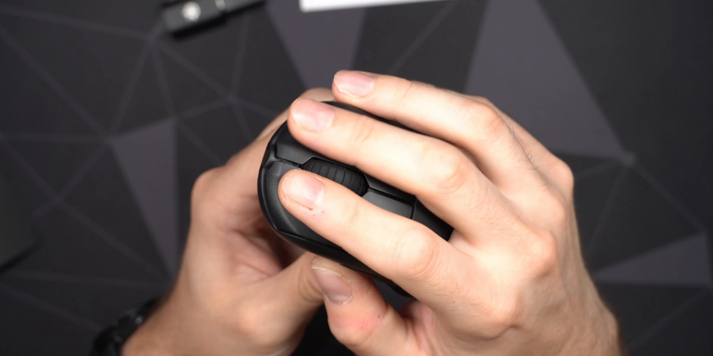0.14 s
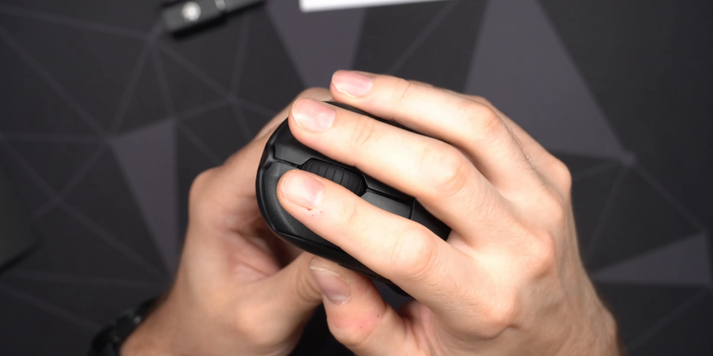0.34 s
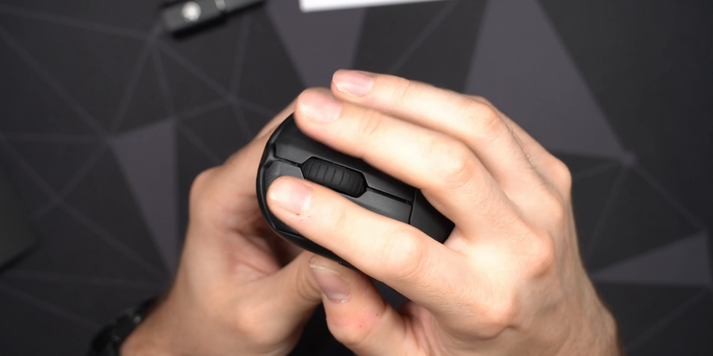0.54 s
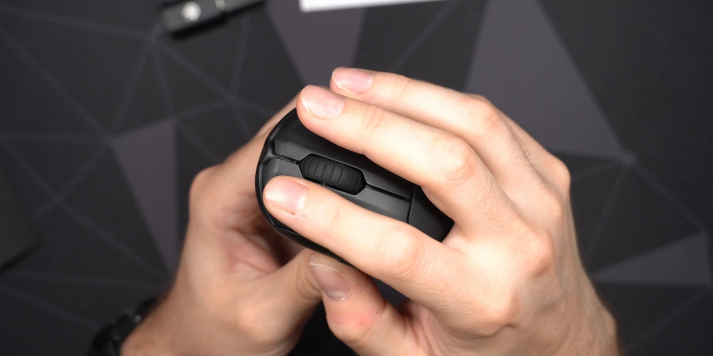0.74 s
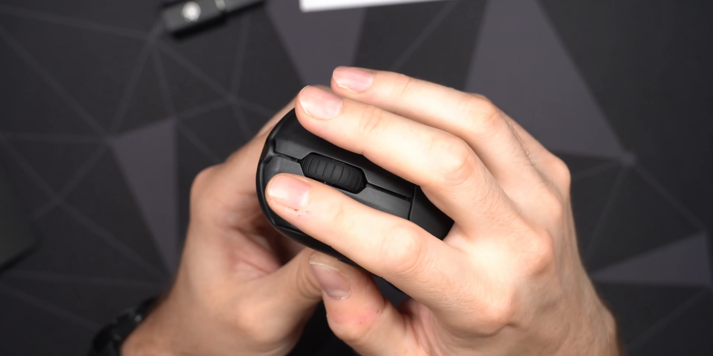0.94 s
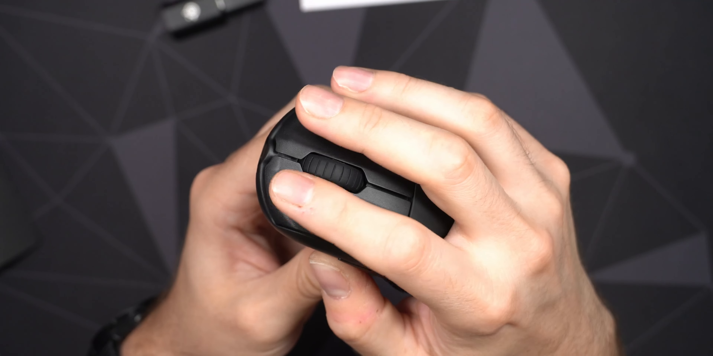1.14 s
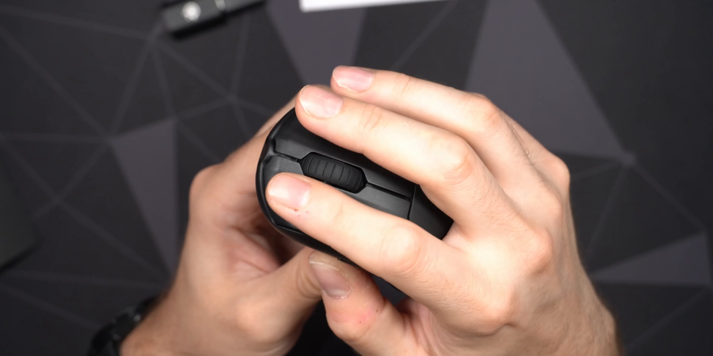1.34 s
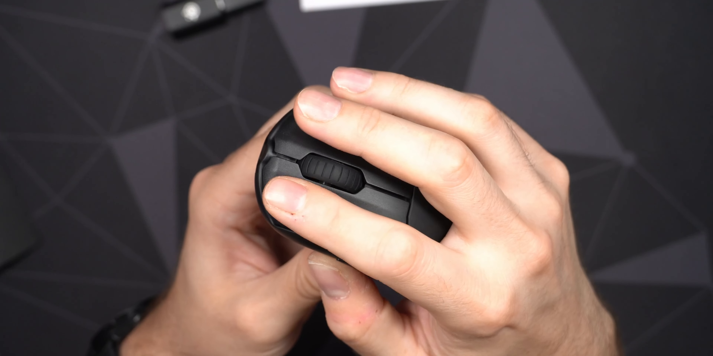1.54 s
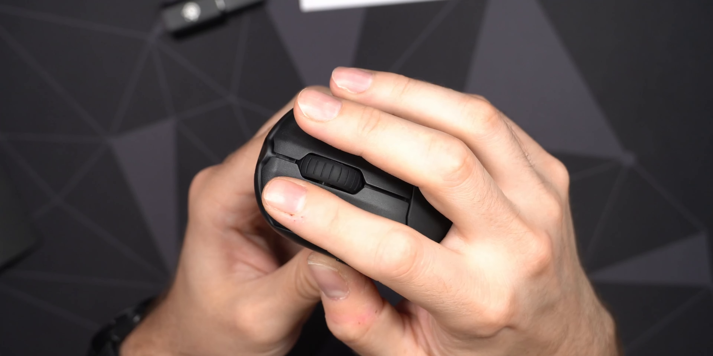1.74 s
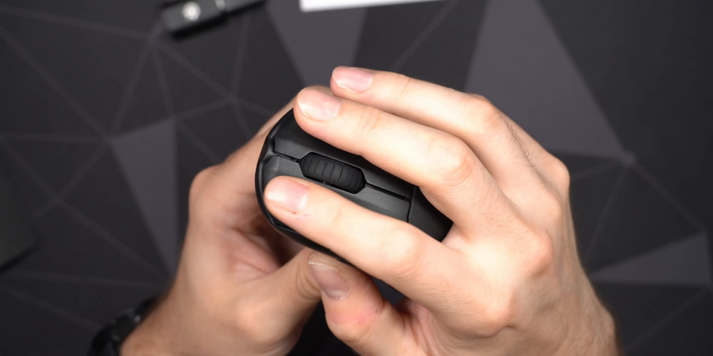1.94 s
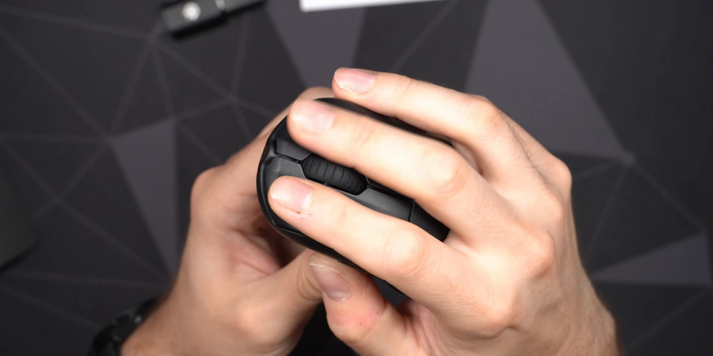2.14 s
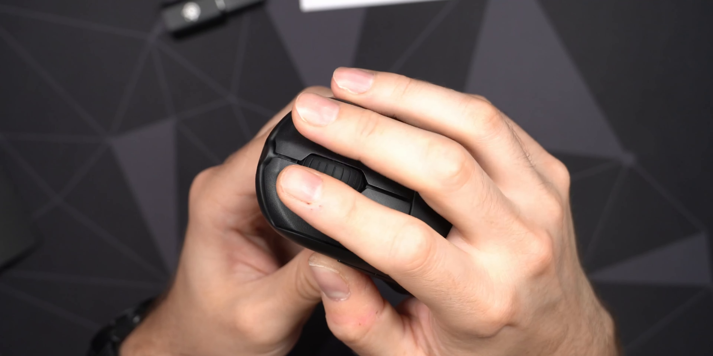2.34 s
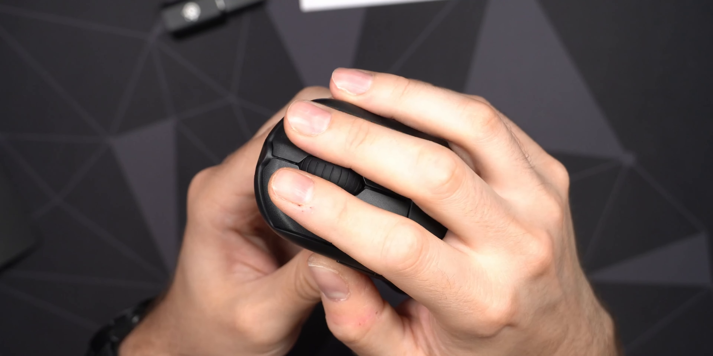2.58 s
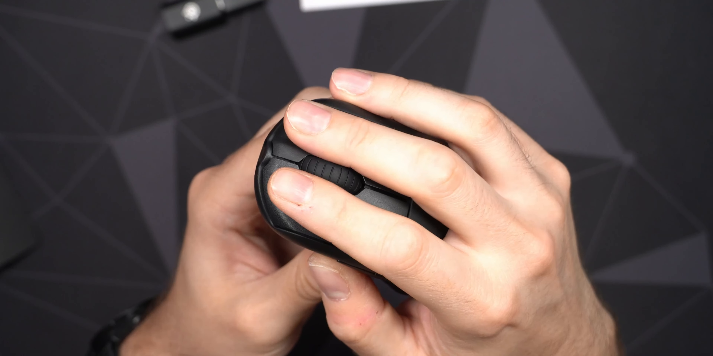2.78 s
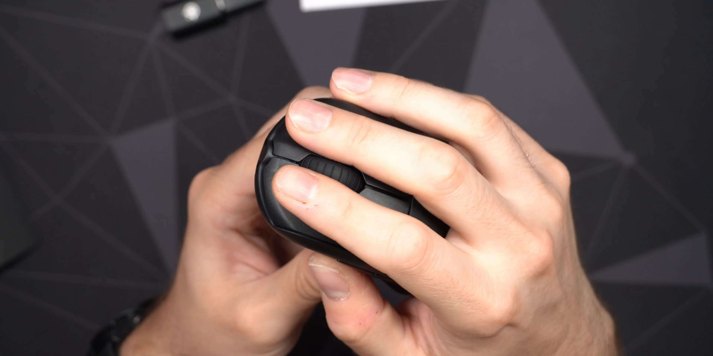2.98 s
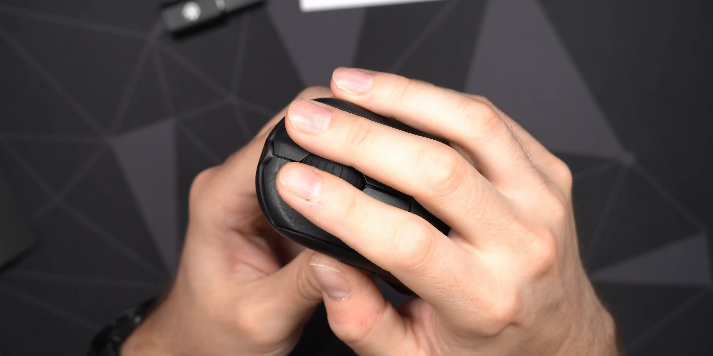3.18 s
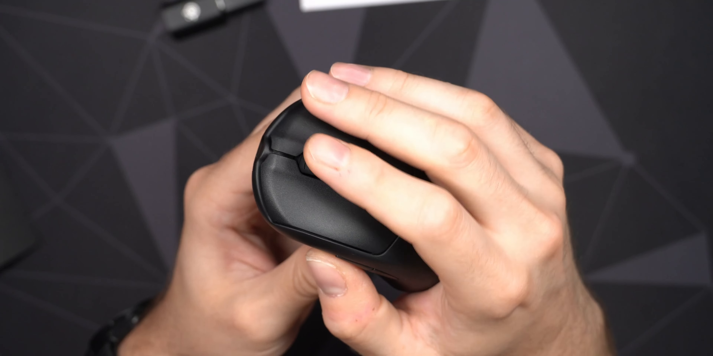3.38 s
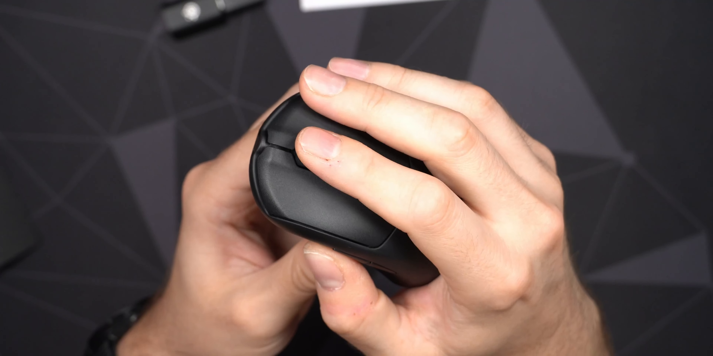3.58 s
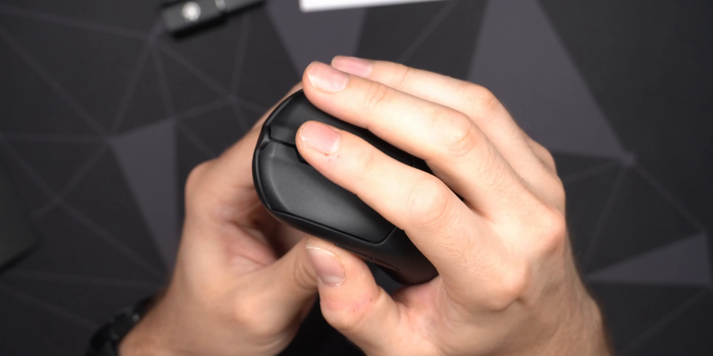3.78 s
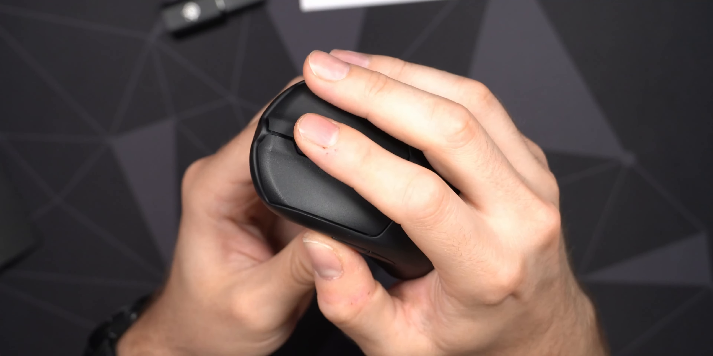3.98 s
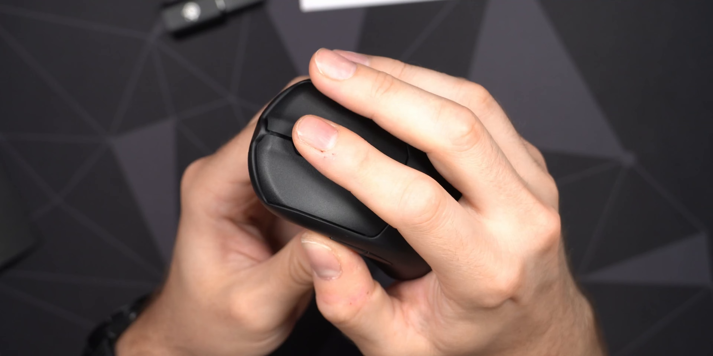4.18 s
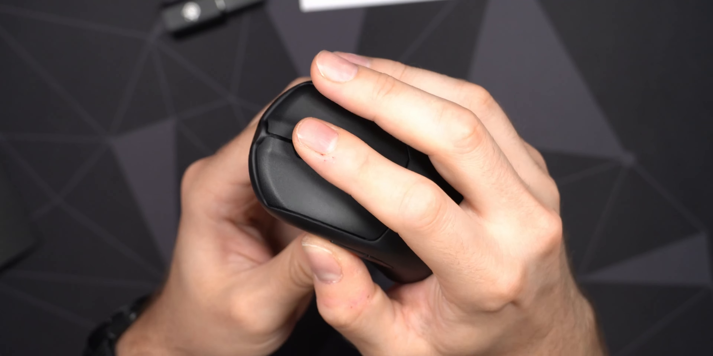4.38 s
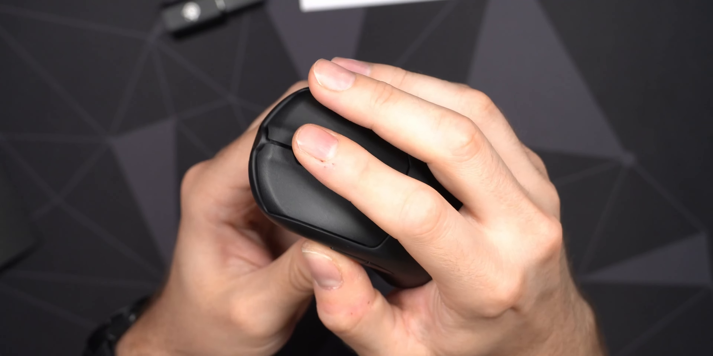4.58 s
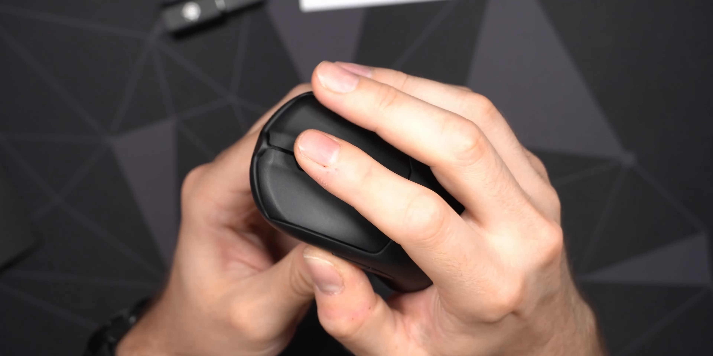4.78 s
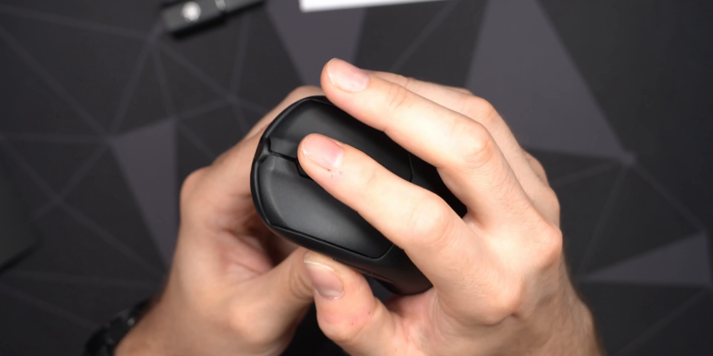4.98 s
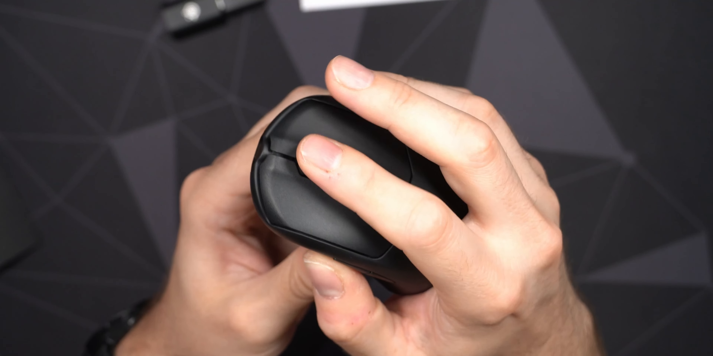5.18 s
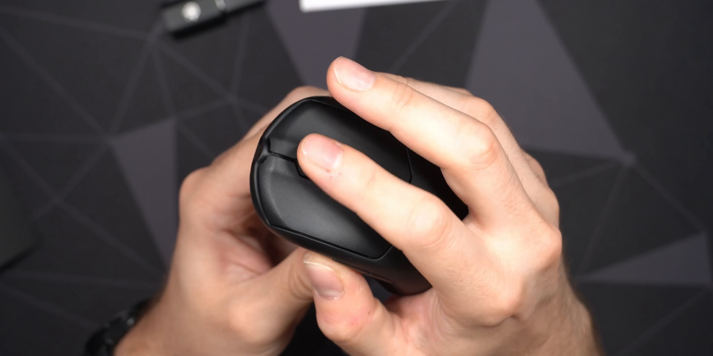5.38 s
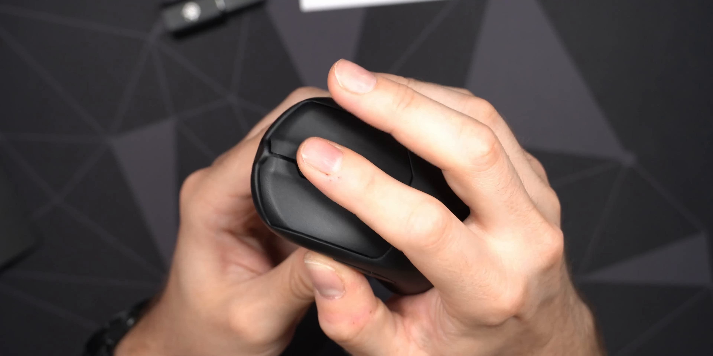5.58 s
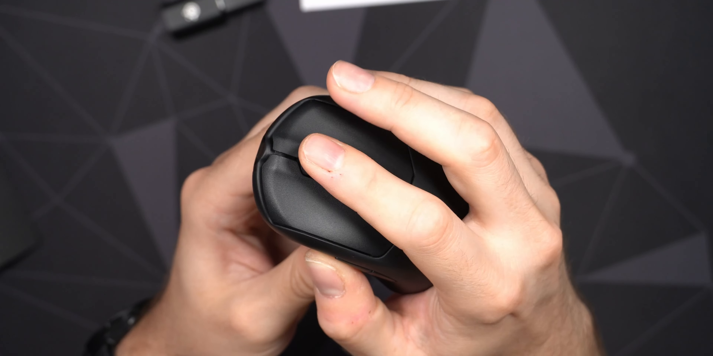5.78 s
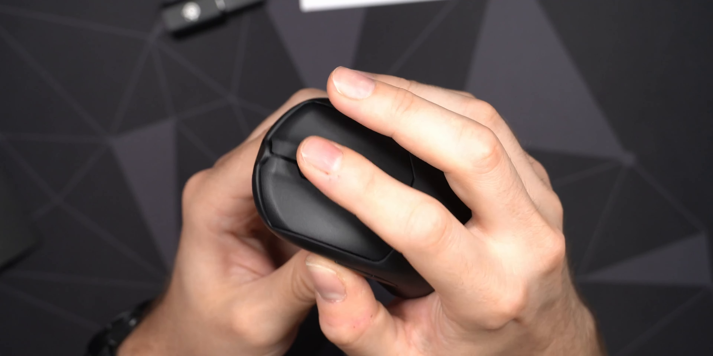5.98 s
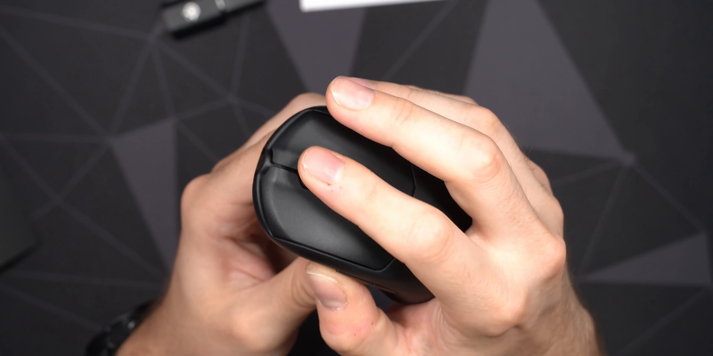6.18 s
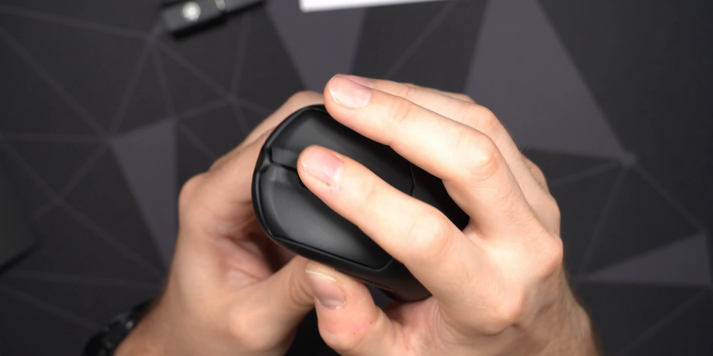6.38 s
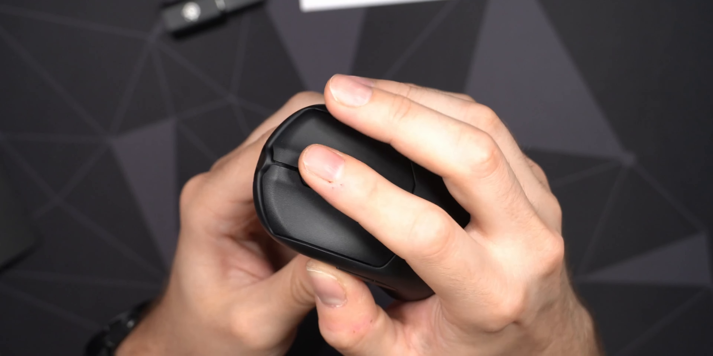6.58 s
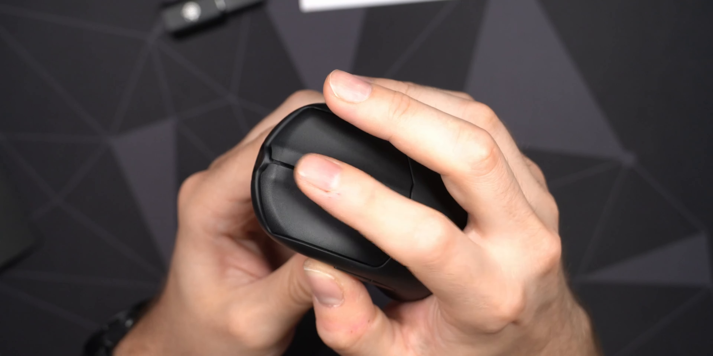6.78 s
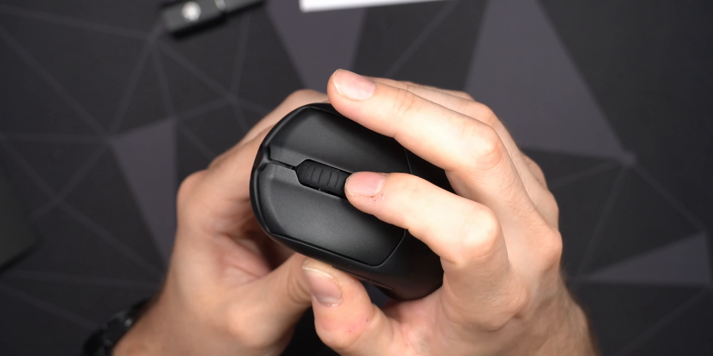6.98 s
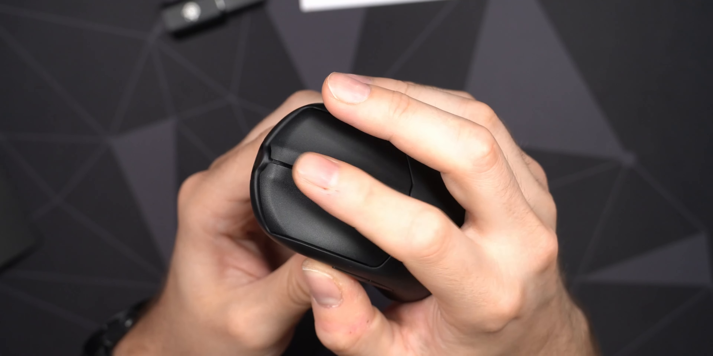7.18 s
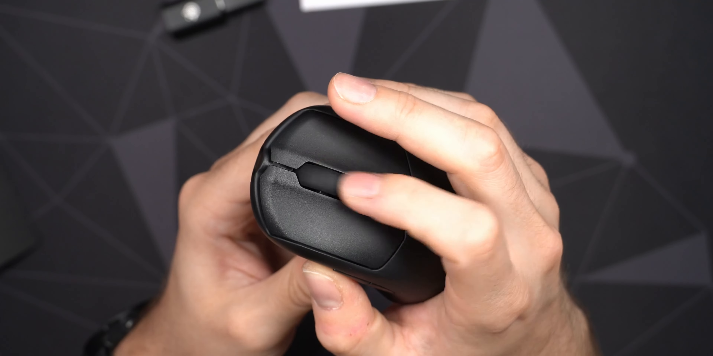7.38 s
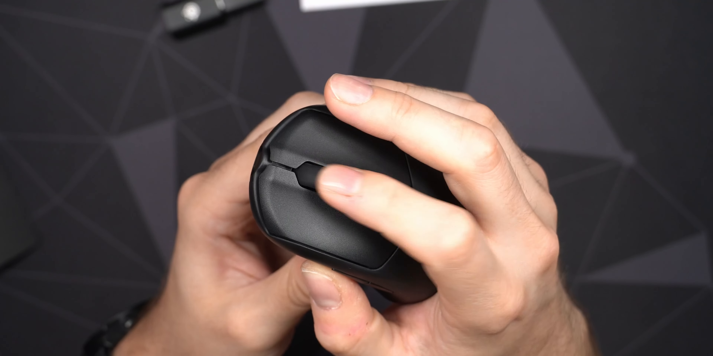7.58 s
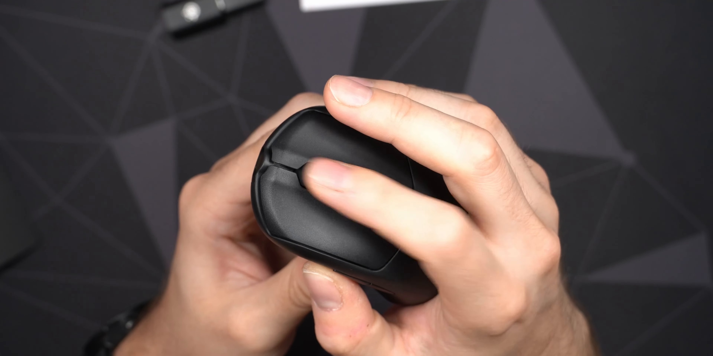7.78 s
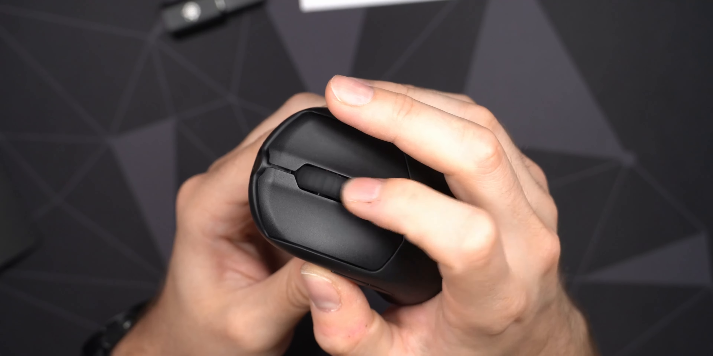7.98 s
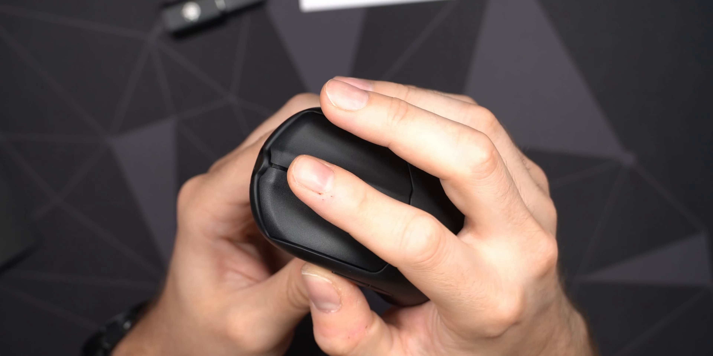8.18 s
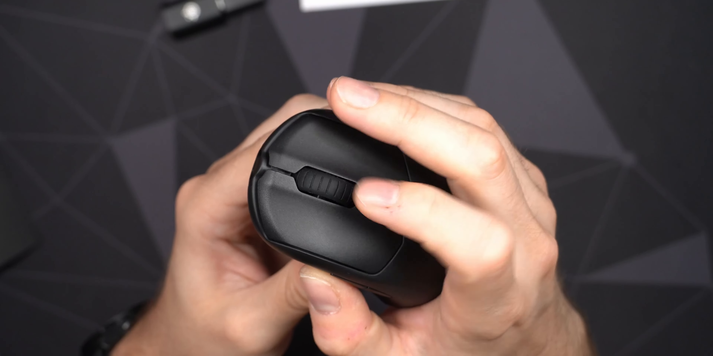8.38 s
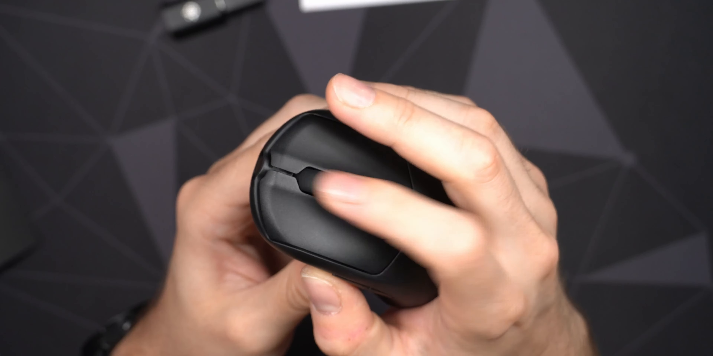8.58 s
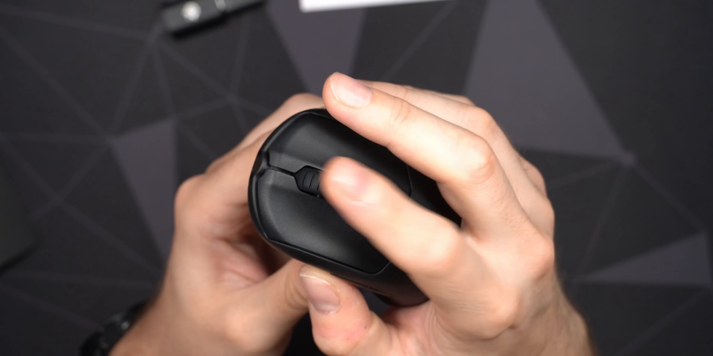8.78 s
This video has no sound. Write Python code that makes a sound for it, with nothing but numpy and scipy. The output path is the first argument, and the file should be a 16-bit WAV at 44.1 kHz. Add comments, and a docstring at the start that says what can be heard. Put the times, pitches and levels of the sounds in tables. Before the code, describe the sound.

Very close, dry sound of a computer mouse held in the hands in a small quiet room. From 0 to 0.45 s the left key gives three crisp clicks, each a hard press snap and a release snap roughly a tenth of a second later. From 0.6 to 2.1 s the right key makes nine even clicks, brighter and sharper. From 2.15 to 3.2 s the left key returns for six more, ending in a faint let-go tick at 3.3. After a short pause, thirteen duller, softer wheel-button clicks run from 3.65 to 6.5 s, slightly slower and uneven, muffled at first, one catching with a different pitch near 5.3. From 6.75 to 8.9 s the notched wheel spins in ten tiny, quiet ratcheting zips, about a quarter second apart, with skin rub and little jolts. Faint fan hum, air and low hand rumble continue beneath.

```python
"""A computer mouse clicks close by in a small quiet room, over air, fan hum and the rumble of hands.
A short run on the left key opens; a longer run on the right and a second on the left follow.
Then the left key is let go with a faint tick, and the duller switch under the wheel is clicked.
At the end a finger spins the ratcheting wheel in short bursts. Clicks, notches, jolts and thumps
are struck banks of decaying sines; contact chatter, skin, rumble, air and hum are filtered noise."""
import sys
import numpy as np
from scipy import signal
from scipy.fft import rfft, irfft
from scipy.io import wavfile

SR = 44100
rng = np.random.default_rng(int(sys.argv[2]) if len(sys.argv) > 2 else 0)


def put_to_file(sound):
    """Save the sound as 16-bit audio at rate SR, in the file named by the first command-line argument."""
    columns = np.atleast_2d(sound).T  # one column per channel
    safe = np.clip(columns, -1, 1)
    whole_steps = np.round(safe * 32767)
    wavfile.write(sys.argv[1], SR, whole_steps.astype(np.int16))


N = 389844


def from_db(db):
    """Decibels as an amplitude factor."""
    return 10 ** (np.asarray(db) / 20)


def at_hz(rows, hz):
    """Each column of a table, read on a log-frequency axis."""
    points, *columns = np.transpose(rows)
    return [np.interp(np.log(hz + 1e-9), np.log(points), column) for column in columns]


def in_time(rows, s):
    """A curve of (seconds, value) points, read at the given times."""
    return np.interp(s, *np.transpose(rows))


def noise(gain_at):
    """Steady noise of rms 1, its spectrum shaped by a gain at each frequency."""
    hz = np.arange(N // 2 + 1) * SR / N
    shaped = irfft(rfft(rng.standard_normal(N)) * gain_at(hz), N)
    return shaped / np.std(shaped)


def add(track, s, sound):
    """Mix a sound into the track at a time in seconds, trimming what falls outside."""
    start = int(round(s * SR))
    sound = sound[max(-start, 0):]
    start = int(np.clip(start, 0, N))
    track[start:start + len(sound)] += sound[:N - start]


def ring(hz, t60, level_db):
    """One blow on a body: decaying sine modes, alternate ones swinging in opposite directions."""
    t = np.arange(SR // 10) / SR
    decays = from_db(-60 * t / t60[:, None])
    swings = decays * np.sin(2 * np.pi * hz[:, None] * t)
    signs = (-1) ** np.arange(len(hz))
    return (from_db(level_db) * signs) @ swings


def knocks(blows, modes, level_db, vary_db):
    """Single blows on one body, each waking its modes a little differently."""
    hz, t60, mode_db = np.transpose(modes)
    out = np.zeros(N)
    for s, db in blows:
        strength_db = vary_db * rng.standard_normal(len(hz))
        add(out, s, ring(hz, t60, mode_db + level_db + db + strength_db))
    return out


def crack(level_db, t60):
    """The bright chatter of the metal contact as it lands: a decaying noise burst."""
    t = np.arange(SR // 30) / SR
    burst = rng.standard_normal(len(t)) * from_db(level_db - 60 * t / t60)
    band = signal.butter(1, [5000, 11000], "band", fs=SR, output="sos")
    return signal.sosfilt(band, burst)


# Modes of the wheel switch when it catches. Each row: frequency in Hz, t60 in seconds, relative level in dB.
CATCH_MODES = [(1085, 0.015, -43.5), (1400, 0.018, -37.5), (1930, 0.0052, -38.5), (2780, 0.013, -35),
               (3260, 0.014, -35), (3500, 0.013, -33), (4640, 0.013, -33.5), (5270, .005, -54),
               (6800, 0.0067, -55), (9500, 0.015, -51)]
CATCH_S = 5.2937  # the press at this time catches on its way down and knocks higher
TREBLE_VARY_DB = 0.75  # spread of brightness from snap to snap


def button(presses, modes, treble_at, level_db, up_db, vary_db, detune, crack_db, crack_t60):
    """The leaf spring snaps once going down and once coming up, never quite alike."""
    hz, t60, down_modes_db, up_modes_db = np.transpose(modes)
    treble = 1 / (1 + (6000 / hz) ** 6)  # share of the brightness each mode takes
    out = np.zeros(N)
    for down_s, up_s, db in presses:
        for s, mode_db in (down_s, down_modes_db), (up_s, up_modes_db + up_db):
            if abs(s - CATCH_S) < .02:
                out += knocks([(s, db)], CATCH_MODES, level_db=0.5, vary_db=4.0)
                continue
            strength, pitch = rng.standard_normal((2, len(hz)))
            bright_db = treble_at(s) + TREBLE_VARY_DB * rng.standard_normal()
            snap_db = level_db + db + mode_db + bright_db * treble + vary_db * strength
            add(out, s, ring(hz * (1 + detune * pitch), t60, snap_db))
            add(out, s, crack(crack_db + db + bright_db, crack_t60))
    return out


# Presses of the left key. Each row: goes down in seconds, springs up in seconds, relative level in dB.
LEFT_PRESSES = [(-.02, .0824, 2), (.176, .2562, 1), (.3401, .4438, 1.2), (2.1578, 2.248, 2),
                (2.3487, 2.4427, 1), (2.5313, 2.6132, 0.7), (2.6976, 2.7842, 0.9), (2.891, 2.9848, 0),
                (3.0642, 3.1908, 2)]
# Modes of the left switch with its plastic key. Each row: frequency in Hz, t60 in seconds,
# relative level going down in dB, relative level springing up in dB.
LEFT_MODES = [(472, 0.02, -48.5, -58), (712, 0.022, -48.5, -58.5), (1345, 0.0093, -42.5, -38.5),
              (1668, 0.021, -44, -39.5), (1840, 0.017, -41.5, -37), (2700, 0.002, -31, -25.5),
              (2970, 0.047, -42.5, -46.5), (3170, 0.0095, -31, -46), (3492, 0.036, -41.5, -32.5),
              (3826, 0.011, -34, -26.5), (4280, 0.017, -35.5, -38), (4400, 0.026, -33, -40.5),
              (5047, 0.013, -27.5, -33.5), (5460, 0.022, -43.5, -42), (6250, 0.0039, -43, -31),
              (6640, 0.016, -46, -39), (7920, 0.0022, -24, -23.5), (8140, 0.028, -43, -36.5),
              (8800, 0.0034, -31.5, -33.5), (9820, 0.024, -45, -40.5), (10760, 0.007, -70, -34),
              (12480, 0.0052, -34, -39), (12540, 0.012, -37, -33), (13500, 0.0036, -26.5, -27.5),
              (14150, 0.007, -34, -32.5), (15200, 0.0091, -39, -35)]
# The finger lets go of the left key. One row: time in seconds, relative level in dB.
LET_GO = (3.2945, -19)


def left_key():
    """The left switch rings through its plastic key, then ticks faintly as the finger lets go."""
    clicks = button(LEFT_PRESSES, LEFT_MODES, lambda s: 0.1, level_db=-0.88, up_db=0.8,
                    vary_db=1.47, detune=0.0052, crack_db=-40.5, crack_t60=0.052)
    down_modes = [mode[:3] for mode in LEFT_MODES]
    return clicks + knocks([LET_GO], down_modes, level_db=0, vary_db=2)


# Presses of the right key. Each row: goes down in seconds, springs up in seconds, relative level in dB.
RIGHT_PRESSES = [(.6265, .7238, 0.56), (.8, .8904, -0.48), (.9797, 1.0597, -0.26), (1.1569, 1.2413, 0.032),
                 (1.321, 1.4129, -0.074), (1.499, 1.5808, -.4), (1.6642, 1.7308, -0.53),
                 (1.8373, 1.9054, 0.056), (1.9679, 2.0814, 0.68)]
# Modes of the right switch with its plastic key. Each row: frequency in Hz, t60 in seconds,
# relative level going down in dB, relative level springing up in dB.
RIGHT_MODES = [(474, 0.025, -45.5, -50), (750, 0.033, -54.5, -58), (1170, 0.04, -61, -65.5),
               (1758, 0.02, -41.5, -45), (2060, 0.023, -43, -47), (2306, 0.018, -37, -38.5),
               (2578, 0.023, -36, -35), (2985, 0.017, -29.5, -31), (3730, 0.016, -35, -38.5),
               (4015, 0.044, -35.5, -40.5), (4406, 0.013, -25.5, -29.5), (4966, 0.028, -31.5, -33.5),
               (5310, 0.011, -31, -31.5), (6350, 0.0034, -34.5, -38), (6580, 0.018, -49.5, -38),
               (7650, 0.012, -34.5, -40.5), (8170, 0.016, -35.5, -47.5), (9390, 0.0062, -25.5, -28),
               (9450, 0.02, -38, -36), (10180, 0.0035, -29, -28.5), (11190, 0.013, -28.5, -42),
               (11640, 0.0084, -29.5, -32), (12380, 0.0057, -26, -37), (13430, 0.0076, -20.5, -36),
               (14540, 0.0035, -26.5, -29.5), (15500, 0.01, -36, -38.5)]


def right_key():
    """The right switch rings through its own plastic key, with a stronger, shorter contact crack."""
    return button(RIGHT_PRESSES, RIGHT_MODES, lambda s: 0.1, level_db=-0.03, up_db=-0.33,
                  vary_db=0.75, detune=0.0039, crack_db=-34.0, crack_t60=0.0227)


# Presses of the wheel. Each row: goes down in seconds, springs up in seconds, relative level in dB.
WHEEL_PRESSES = [(3.657, 3.782, 0.71), (3.8782, 4.0177, -0.29), (4.1014, 4.2184, 0.54),
                 (4.2839, 4.3995, -.7), (4.4779, 4.5812, -0.58), (4.8221, 4.9427, -0.63),
                 (5.0131, 5.1353, -0.58), (5.2937, 5.5072, -0.16), (5.5458, 5.7068, -0.11),
                 (5.8078, 5.9634, -0.22), (6.0005, 6.1504, -0.078), (6.2272, 6.3282, -0.37),
                 (6.3911, 6.5284, -0.46)]
# Modes of the switch under the wheel. Each row: frequency in Hz, t60 in seconds,
# relative level going down in dB, relative level springing up in dB.
WHEEL_MODES = [(304, 0.037, -56.5, -54), (462, 0.066, -56.5, -53), (682, 0.071, -56, -63.5),
               (1090, 0.016, -46, -46), (1282, 0.048, -52, -53), (1460, 0.018, -41, -40.5),
               (1870, 0.016, -38.5, -39), (2032, 0.043, -41.5, -37), (2480, 0.0037, -35.5, -33),
               (2880, 0.016, -36, -37.5), (3016, 0.017, -39.5, -37), (3217, 0.015, -40, -38),
               (3561, 0.027, -38.5, -40.5), (4117, 0.019, -44, -37.5), (4757, 0.013, -35, -38),
               (5320, 0.021, -47, -47), (5300, 0.0098, -48, -39.5), (7130, 0.011, -49, -48.5),
               (7840, 0.0092, -66, -42), (9450, 0.0097, -46.5, -46), (11230, 0.0055, -46.5, -43.5),
               (12500, 0.0085, -49, -60), (14340, 0.0036, -44, -62), (15400, 0.005, -40, -60)]
# Treble of the wheel's clicks, dullest at first and brighter later. Each row: time in seconds, treble in dB.
WHEEL_TREBLE = [(3.65, -9.5), (4.5, -3.5), (5, -3.5), (5.95, -2.5), (6.5, -3.5)]


def wheel_switch():
    """The switch under the wheel snaps like the keys, with a duller ring and a weaker crack."""
    return button(WHEEL_PRESSES, WHEEL_MODES, lambda s: in_time(WHEEL_TREBLE, s), level_db=0.5, up_db=-0.43,
                  vary_db=1.5, detune=0.0065, crack_db=-45.5, crack_t60=0.027)


# Spins of the wheel. Each row: start in seconds, end in seconds, notches per second, relative level in dB,
# boost of the axle's hollow knock in dB.
SPINS = [(6.764, 6.839, 230, -37, 8), (7.039, 7.12, 235, -37, 12.5), (7.274, 7.336, 233, -35, 5.5),
         (7.49, 7.526, 160, -33.5, 0), (7.548, 7.597, 159, -38.5, 16), (7.726, 7.802, 136, -34.5, 3.5),
         (7.973, 8.039, 200, -33.5, 11), (8.2, 8.259, 175, -30.5, -1.5), (8.523, 8.586, 138, -34, -25),
         (8.828, 8.894, 170, -36, -19)]
# Modes of the wheel in its cradle. Each row: frequency in Hz, t60 in seconds, relative level in dB.
RATCHET_MODES = [(482, 0.11, -29), (672, 0.052, -24.5), (974, 0.016, -17.5), (1290, 0.019, -21.5),
                 (1425, 0.097, -28.5), (1700, 0.024, -21.5), (2017, 0.03, -22), (2360, 0.053, -32.5),
                 (3110, 0.01, -16.5), (3970, 0.014, -18.5), (4450, 0.011, -20.5), (5110, 0.021, -23),
                 (5810, 0.019, -33), (6570, 0.01, -34), (7900, 0.017, -39), (9900, 0.0034, -33),
                 (12500, 0.0022, -30), (15000, 0.0018, -33)]
# The wheel rocks over odd teeth as the finger lands and leaves; their level is relative to the spin.
STRAY_NOTCHES_PER_S, STRAY_DB = 70, -7.0


def scroll(spin_db, uneven, edge_db, tooth_db, colour_db, axle_hz, lead_s, lead_db, rub_db):
    """The detent spring drops into notch after notch, and rubs over the teeth between them."""
    hz, t60, mode_db = np.transpose(RATCHET_MODES)
    axle = np.exp(-(2 * np.log2(hz / axle_hz)) ** 2)
    t = np.arange(N) / SR
    out, pressure = np.zeros(N), np.zeros(N)
    for start, end, per_s, db, knock_db in SPINS:
        s = start - lead_s * rng.uniform(.5, 1)
        # no two teeth catch the spring alike
        for timing, strength, *colour in rng.uniform(-1, 1, (40, len(hz) + 2)):
            turning = start <= s < end
            if turning:
                # the notches are strongest at either end of a spin
                edge = 1 - np.sin(np.pi * (s - start) / (end - start))
                push_db = edge_db * edge + knock_db * axle
            else:
                push_db = STRAY_DB
            if s < end + lead_s:
                vary_db = tooth_db * strength + colour_db * np.array(colour)
                add(out, s, ring(hz, t60, mode_db + spin_db + db + push_db + vary_db))
            gap = (1 + uneven * timing) / (per_s if turning else STRAY_NOTCHES_PER_S)
            # a stray tooth never skips past the start of the spin
            s = min(s + gap, start) if s < start else s + gap
        # the fingertip brushes the rubber from just before the spin until just after it
        brush = np.interp(t, [start - lead_s, start, end, end + lead_s / 2], [0, 1, 1, 0]) ** .5
        rub = from_db(rub_db) * ((t > start) & (t < end))
        pressure += from_db(db) * (rub + from_db(lead_db) * brush)
    # about 900 random grains a second, each ringing the wheel
    grains = pressure * rng.standard_normal(N) * (rng.random(N) < 900 / SR)
    return out + signal.fftconvolve(grains, ring(hz, t60, mode_db))[:N]


def skin(level_db, low_hz, slide_s):
    """Dry skin swishes over the rubber, louder in a harder spin, and slides off it at the end."""
    t = np.arange(N) / SR
    touch = np.zeros(N)
    for start, end, _, db, _ in SPINS:
        touch += from_db(db) * np.interp(t, [start - slide_s / 2, end, end + slide_s], [0, 1, 0])
    swish = noise(lambda f: f / (f + low_hz) / (1 + (f / 14000) ** 4))
    return from_db(level_db) * touch * swish


# Jolts of the wheel under the finger. Each row: time in seconds, relative level in dB.
JOLTS = [(3.495, -40.5), (3.638, -34), (5.786, -31.5), (7.0155, -19.5), (7.044, -21), (7.327, -25.5),
         (7.57, -21.5), (7.587, -23), (7.951, -27), (7.9765, -19), (8.027, -21), (8.04, -21)]


def jolts():
    """The wheel jolts in its cradle and rings the same modes as the ratchet."""
    return knocks(JOLTS, RATCHET_MODES, level_db=-6.0, vary_db=2.0)


# Low knocks on the shell: a fingertip thumps it now and then, and at 3.29 s the shell knocks low as the finger
# lets go of the left key. Each row: time in seconds, relative level in dB.
THUMPS = [(1.1575, -64), (1.969, -58), (3.191, -66), (3.2945, -58.5), (5.786, -77)]
# Low modes of the hollow shell. Each row: frequency in Hz, t60 in seconds, relative level in dB.
SHELL_MODES = [(301, 0.054, -2), (385, 0.028, 2), (472, .06, -30)]


def thumps():
    """The hollow shell knocks now and then, under a fingertip or as the finger lets go, and wakes its low
    modes."""
    return knocks(THUMPS, SHELL_MODES, level_db=6.5, vary_db=4.0)


# Echoes by band. Each row: frequency in Hz, t60 of the room in seconds, relative level of the room in dB,
# relative level of the scatter from hands and desk in dB.
ROOM = [(300, 0.26, -24.5, -5), (995, 0.83, -11, -10.5), (2040, 0.78, -24.5, -10), (2850, 0.27, -21, -7),
        (4170, 0.2, -17.5, -29.5), (5220, 0.23, -22, -17), (6450, 0.3, -18, -14.5),
        (8480, 0.36, -22.5, -21), (10850, 0.2, -22, -25.5), (13400, 0.25, -27.5, -25),
        (15500, 0.27, -25.5, -30)]


def room(x, near_t60, near_delay_s, wall_delay_s):
    """Quick scatter from hands and desk, then a faint tail that dies at its own rate in each band."""
    t = np.arange(SR // 2) / SR

    def echoes(delay_s, t60):
        """Decaying noise of about unit energy that fades in over a millisecond after its delay."""
        shape = from_db(-60 * t / t60) * np.clip((t - delay_s) * 1000, 0, 1)
        return rng.standard_normal(len(t)) * shape / np.linalg.norm(shape)

    response = np.zeros(len(t))
    edges = np.linspace(np.sqrt(150), np.sqrt(17000), 21) ** 2  # 20 bands, in Hz
    for low, high in zip(edges, edges[1:]):
        t60, wall_db, near_db = at_hz(ROOM, np.sqrt(low * high))
        walls = from_db(wall_db) * echoes(wall_delay_s, t60)
        scatter = from_db(near_db) * echoes(near_delay_s, near_t60)
        band = signal.butter(2, [low, high], "band", fs=SR, output="sos")
        response += signal.sosfilt(band, walls + scatter)
    return signal.fftconvolve(x, response)[:N]


# Slow level of the hands' rumble. Each row: time in seconds, level in dB.
HANDLING = [(0, -73.5), (1.5, -73), (3.3, -77), (3.7, -69), (5.5, -71.5), (6.4, -69.5), (7.3, -74),
            (7.95, -68), (8.8, -73)]
# Dull spectrum of the hands on the shell. Each row: frequency in Hz, relative density in dB per Hz.
RUMBLE = [(25, -46.5), (50, -28), (100, 4), (170, 1), (280, -3.5), (450, -14), (1000, -51)]
FIDGETS_PER_S, FIDGET_DB = 7.5, 3.5  # top rate of the wavering grip in Hz, and its rms depth


def hands():
    """Restless low rumble on the shell, as the grip tightens and eases at random."""
    fidget_db = FIDGET_DB * noise(lambda f: 1 / (1 + (f / FIDGETS_PER_S) ** 4))
    grip_db = in_time(HANDLING, np.arange(N) / SR) + fidget_db
    return from_db(grip_db) * noise(lambda f: from_db(at_hz(RUMBLE, f)[0]))


# Hum of a computer fan. Each row: frequency in Hz, half-width in Hz, rms level in dB.
HUM = [(60, 7.3, -85), (113.7, 9.3, -82), (562.9, 4, -78), (1225, 74, -86.5), (1426, 45, -86)]


def fan_hum():
    """A computer fan hums: narrow bands of noise around a few pitches."""
    out = np.zeros(N)
    for hz, width, db in HUM:
        out += from_db(db) * noise(lambda f: 1 / (1 + ((f - hz) / width) ** 2))
    return out


# Spectrum of the still room. Each row: frequency in Hz, relative density in dB per Hz.
AIR = [(25, -49), (60, -33), (130, -9), (300, -15.5), (560, -7.5), (850, -15), (1300, -9), (1650, -20.5),
       (2100, -16.5), (3500, -21), (6000, -27), (13000, -29.5), (16000, -33.5)]
AIR_DB = -71  # rms


def room_air():
    """The still air of the room: steady noise, strongest through the low mids."""
    return from_db(AIR_DB) * noise(lambda f: from_db(at_hz(AIR, f)[0]))


def scene():
    """Three switches, the wheel and the shell, heard with the room."""
    wheel = scroll(spin_db=-7.0, uneven=.35, edge_db=1.5, tooth_db=6, colour_db=8.5, axle_hz=720,
                   lead_s=.04, lead_db=-19.5, rub_db=-13.5)
    wheel += jolts() + skin(level_db=-38.5, low_hz=3000, slide_s=0.014)
    mouse = left_key() + right_key() + wheel_switch() + wheel + thumps()
    space = room(mouse, near_t60=0.063, near_delay_s=0.0026, wall_delay_s=0.0056)
    background = hands() + fan_hum() + room_air()
    return (mouse + space + background)[None]


CUTOFF_HZ = 16700


def record(dry):
    """A steep elliptic low-pass cuts the top."""
    return signal.sosfilt(signal.ellip(10, .1, 80, CUTOFF_HZ, fs=SR, output="sos"), dry)


dry = scene()
out = record(dry)
put_to_file(out)
```